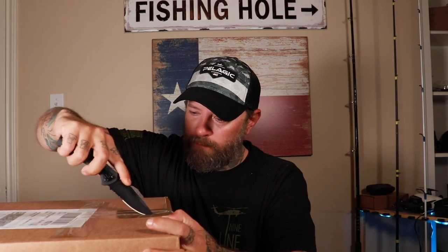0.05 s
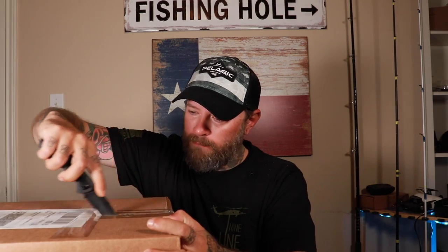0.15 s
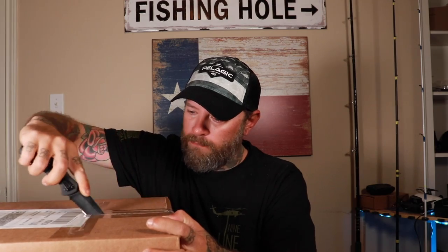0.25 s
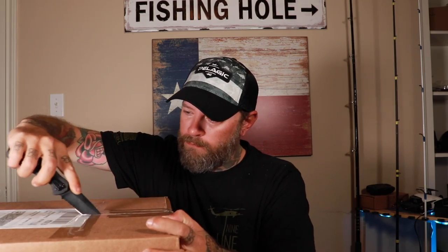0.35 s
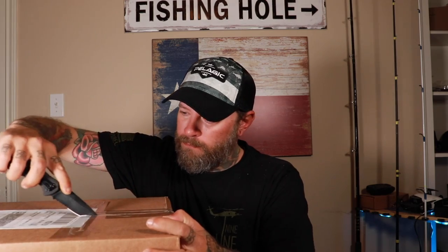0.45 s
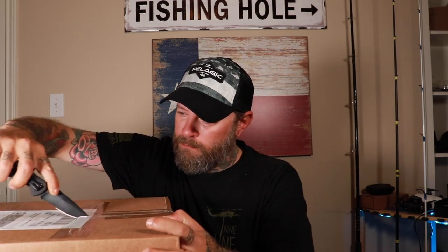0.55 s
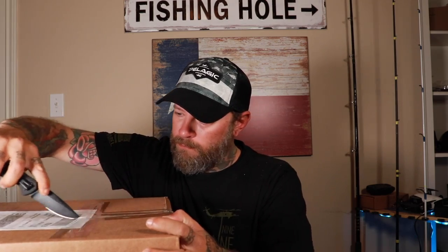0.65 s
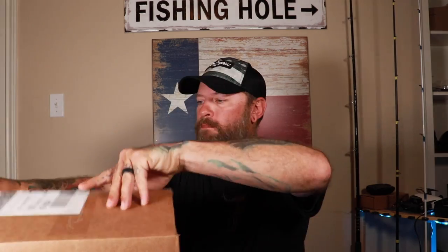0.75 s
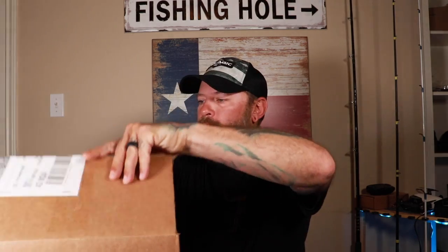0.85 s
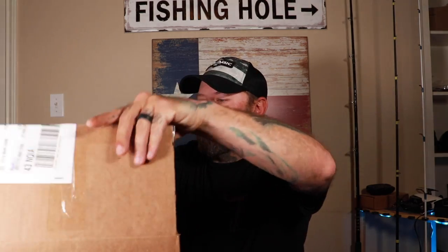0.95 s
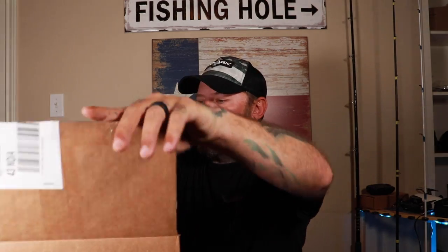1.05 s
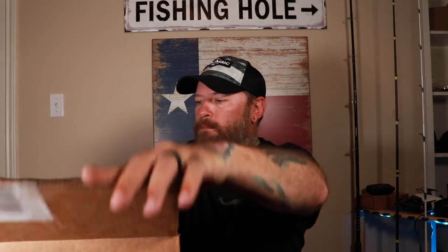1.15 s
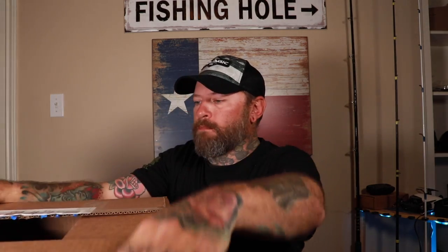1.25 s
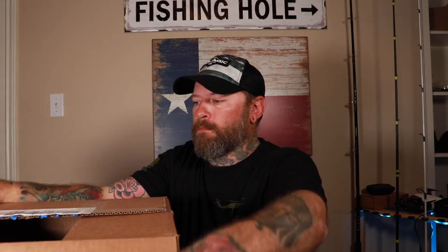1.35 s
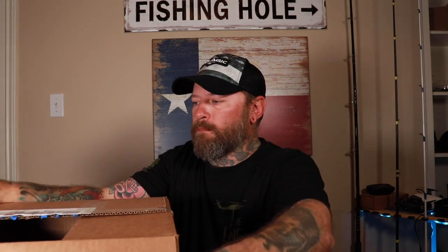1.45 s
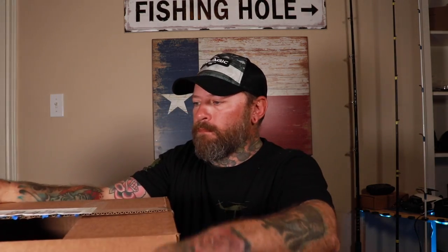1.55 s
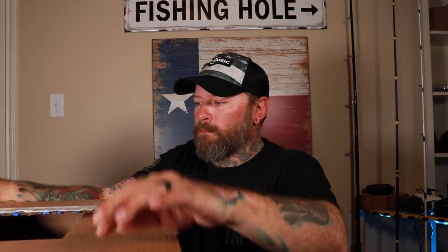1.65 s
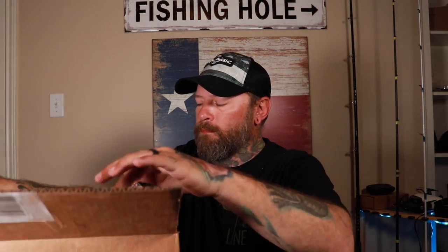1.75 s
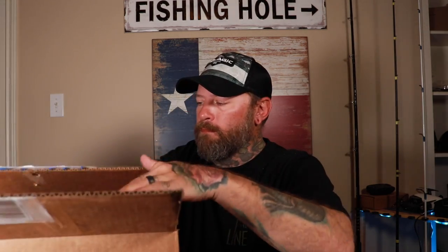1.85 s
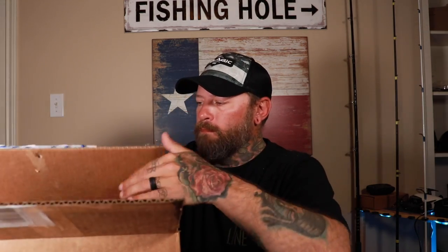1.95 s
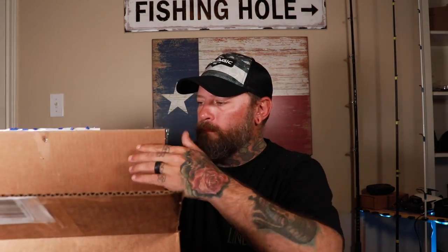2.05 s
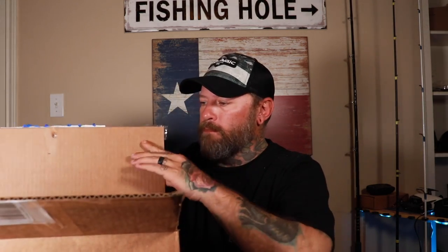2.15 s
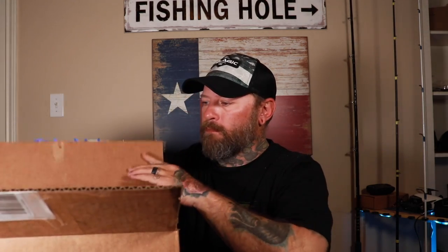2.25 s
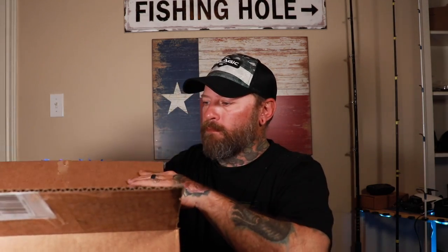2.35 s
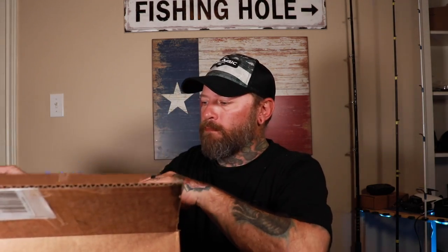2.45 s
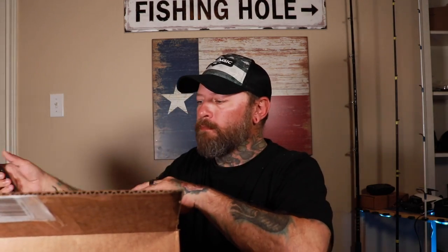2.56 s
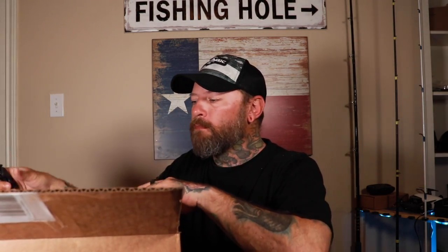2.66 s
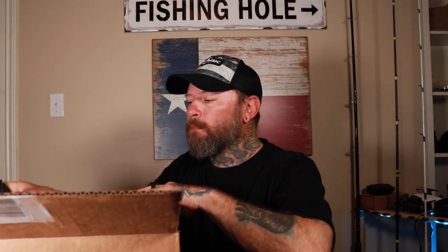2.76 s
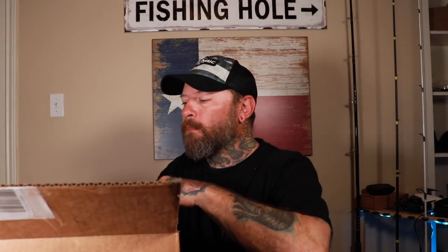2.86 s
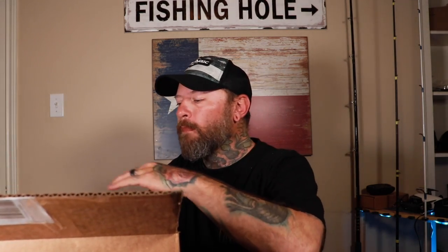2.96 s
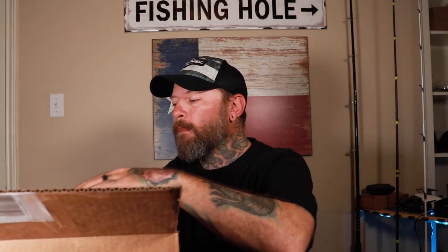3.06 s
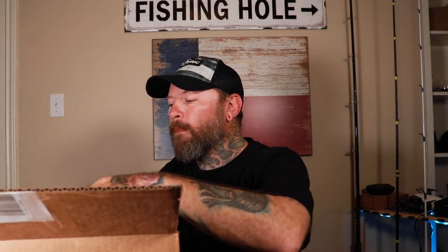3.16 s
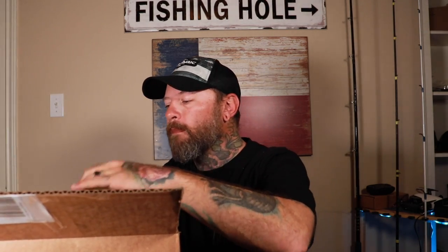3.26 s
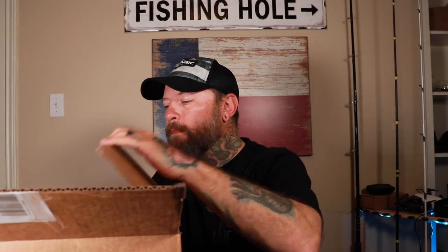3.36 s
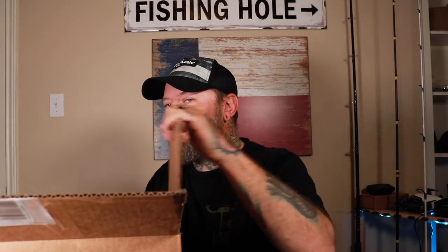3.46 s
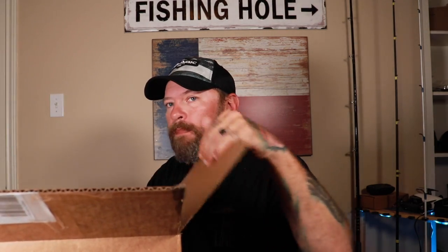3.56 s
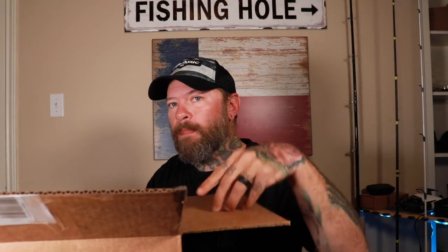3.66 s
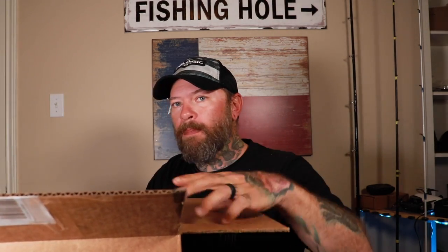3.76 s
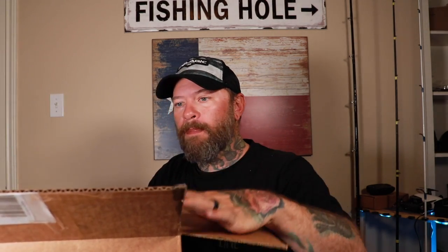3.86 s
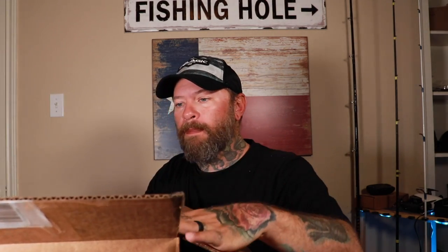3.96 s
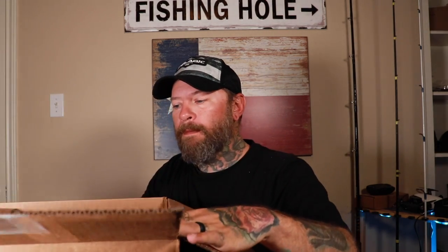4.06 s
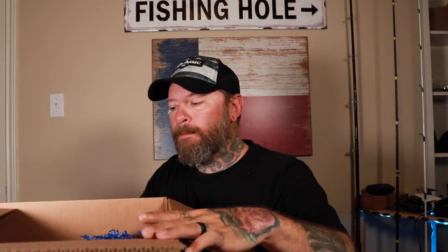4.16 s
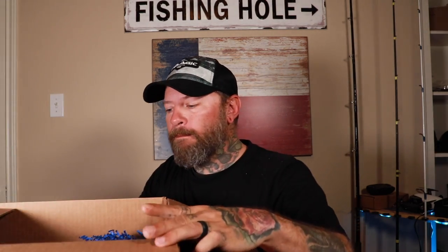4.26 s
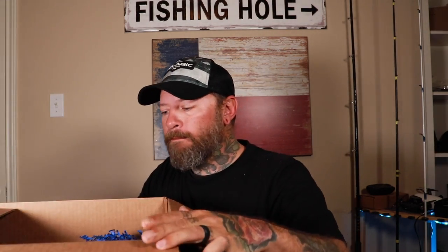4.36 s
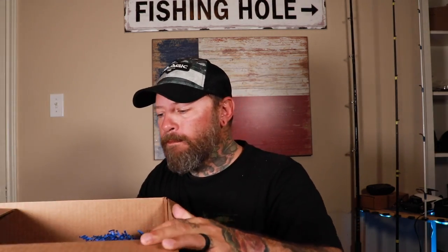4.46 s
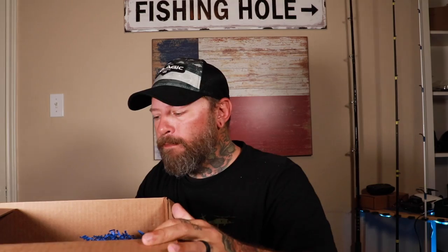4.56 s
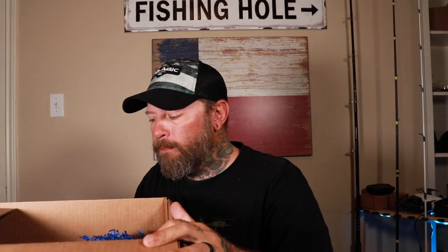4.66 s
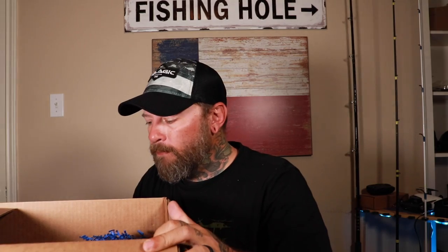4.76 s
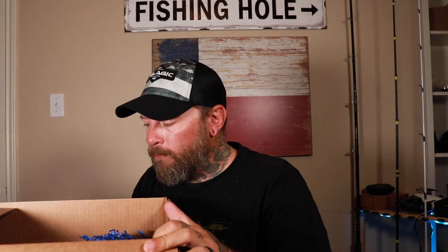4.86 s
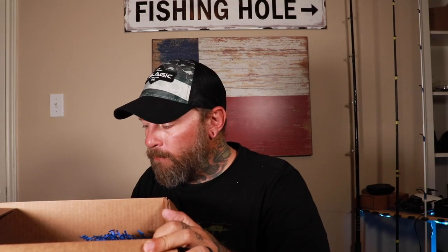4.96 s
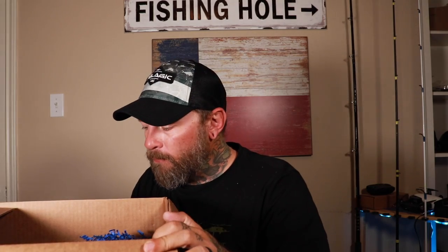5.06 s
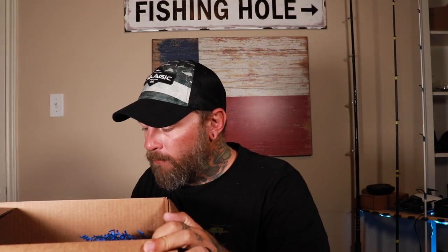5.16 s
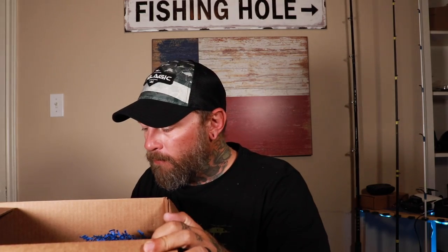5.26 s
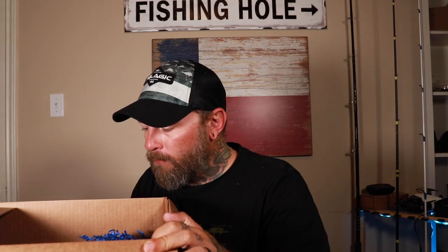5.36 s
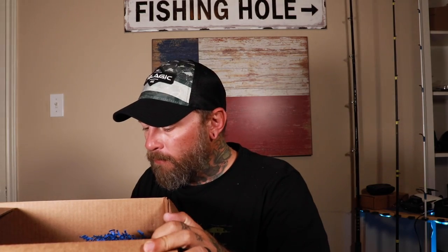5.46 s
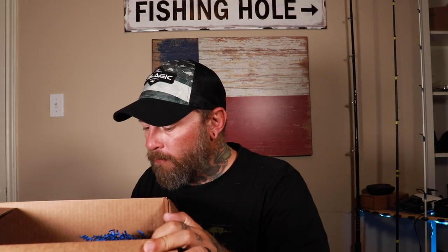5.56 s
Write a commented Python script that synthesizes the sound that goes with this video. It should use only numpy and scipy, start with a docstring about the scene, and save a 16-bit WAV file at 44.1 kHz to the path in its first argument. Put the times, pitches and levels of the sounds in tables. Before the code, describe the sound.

Dry close microphone indoors: harsh blade rasps along a taped seam, then an abrupt edit into a boomy cardboard thump with small tape cracks. Hands scuff and tap the hollow box ever more quietly. Midway comes almost stillness, then a brisk cluster of scrapes, knocks and fibre snaps as a flap folds back, another hollow knock, and tiny fading brushes.

```python
"""Quiet room, close by: a knife slits the tape of a cardboard box, then hands tilt, rub and unfold it.
Blade and skin stick and slip; the jerks excite resonances of board, fibres and box walls.
Knocks ring the hollow box; tape and fibres snap as short noise cracks.
After the knife strokes the sound cuts dead and fades back in; a dull echo and faint hiss lie behind."""
import sys
import numpy as np
from scipy import signal
from scipy.fft import rfft, irfft
from scipy.io import wavfile
from scipy.ndimage import uniform_filter1d

SR = 44100
rng = np.random.default_rng(int(sys.argv[2]) if len(sys.argv) > 2 else 0)


def output_pcm(signal):
    """Save a mono or channel-first signal as 16-bit PCM at the path in sys.argv[1].

    Samples are clipped to [-1, 1] before scaling.
    """
    pcm = np.clip(np.atleast_2d(signal).T, -1, 1) * 32767
    wavfile.write(sys.argv[1], SR, np.round(pcm).astype(np.int16))


N = 246959
GAP_S, GAP_FADE_S = 0.7745, 0.033  # dead cut, then linear fade-in


def undb(db):
    """Decibels to amplitude gain."""
    return 10 ** (np.asarray(db) / 20)


def unit(x):
    """Scale to rms 1."""
    return x / np.sqrt(np.mean(x ** 2))


def resonate(x, hz, width_hz):
    """Two-pole band-pass, gain 1 at the centre."""
    b, a = signal.iirpeak(hz, hz / width_hz, fs=SR)
    return signal.lfilter(b, a, x)


def walk(rate_hz):
    """Random levels, one per 1 / rate_hz, joined by ramps; spread near 1."""
    hold = int(SR / rate_hz)
    levels = rng.standard_normal(N // hold + 1)
    return 1.255 * uniform_filter1d(np.repeat(levels, hold), hold)[:N]


# Hollow box: air cavity below 170 Hz, walls above. Columns: mode_hz, level_db, t60_s
BOX_MODES = [(70, -12, 0.11), (95, -6, 0.31), (138.5, 0, 0.38), (183.2, -6.5, .2), (219, -4.5, 0.07),
             (286.7, -1.5, 0.17), (349, -4, 0.26), (420.3, -9.5, 0.18), (470.4, -4.5, .18),
             (517, -7, 0.087), (602, -5.5, 0.083), (737, -9.5, 0.072), (842, -11, 0.094), (945, -7, 0.091),
             (1047, -10, 0.081)]
# Stiff board under blade and skin. Columns: centre_hz, width_hz, level_db
BOARD_PEAKS = [(1290, 300, -2.5), (1589, 480, 5.5), (1972, 590, 1.5), (2750, 950, -4), (3080, 1200, -6.5)]
# Steady draw of the blade along the taped seam. Columns: centre_hz, width_hz, level_db
BLADE_PEAKS = [(1057, 84, 2), (1598, 51, 6.5), (1910, 200, 1.5), (2520, 140, -6), (2810, 98, -4),
               (4260, 190, -21), (5030, 340, -11), (6200, 370, -17)]
# Fibre rasp. Columns: centre_hz, width_hz, level_db
RASP_PEAKS = [(4180, 1300, 0.17), (5820, 2500, -1.2)]
# Fine fibre hiss. Columns: centre_hz, width_hz, level_db
FIBRE_PEAKS = [(8550, 1400, 5.5), (11400, 3000, -8.5), (13900, 3900, -15)]


def rubbing():
    """Blade and hands drag on cardboard: board scrape, fibre hiss, and the box driven through its walls."""
    t = np.arange(N) / SR
    scrape_gain, boom_gain, rattle_gain, rasp_gain, hiss_gain, wall_hz = strokes(t)
    # the hand damps the walls: modes wider than in free ringing
    damped = [(hz, 2.33 * np.log(1000) / (np.pi * t60_s), db) for hz, db, t60_s in BOX_MODES]
    low_modes = [m for m in damped if m[0] < 550]
    high_modes = [m for m in damped if m[0] >= 550]

    coarse = slips(1200, spread_db=2.0)
    fine = slips(5000, spread_db=3.0)
    boom = sweep(coarse, 2.36, low_modes, wall_hz, focus_db=9.0)
    rattle = resonate(through(coarse, 1.26, high_modes, drift_db=2.5), 820, 1000)
    scrape = resonate(through(coarse + fine, 2.5, BOARD_PEAKS, drift_db=3.0), 2300, 3500)
    rasp = resonate(through(coarse + fine, 2.32, RASP_PEAKS, drift_db=2.5), 4600, 4500)
    hiss = resonate(through(fine, 1.2, FIBRE_PEAKS, drift_db=5.0), 8900, 11000)

    # the steady draw sets in within 2 ms and mostly replaces the scrape until the gap
    drawing = np.interp(t, (0.423, 0.425), (0, 1)) * (t < GAP_S)
    blade = through(coarse, 2.9, BLADE_PEAKS, drift_db=0.5)
    scrape = (1 - 0.93 * drawing) * unit(scrape) + drawing * undb(1.5) * blade

    mix = scrape_gain * scrape + boom_gain * boom + rattle_gain * unit(rattle)
    mix = mix + rasp_gain * unit(rasp) + hiss_gain * unit(hiss)
    judder = undb(1.13 * walk(70))
    return mix * judder


# Strokes of blade or hand; swell and fade are times per 20 dB, floored in strokes().
# Columns: full_s, swell_s, hold_s, fade_s, scrape_db, boom_rel_db, pressed_wall_hz,
#          rattle_rel_db, rasp_rel_db, hiss_rel_db
STROKES = [(0.019, 2.5, 0.058, 0.1938, -26.5, 5, 272, -2, -2, -9.5),
           (0.177, -0.17, 0.028, 0.17, -23.5, 3, 320, 2, -8.5, -10),
           (0.252, 0.03, 0.045, 0.17, -26, 4, 288, 4, -10, -14.5),
           (0.449, -0.8, 0.15, -0.04, -38.5, 3.5, 258.7, -0.5, -8, -14),
           (0.593, -0.17, 0.068, -0.17, -39, 9, 219.8, -1, -10, -12.5),
           (0.714, 0.3, .3, -4, -41, 6.5, 225, 1, -9, -15),
           (.811, .05, .03, .1, -42.5, -5, 340, -1, -7, -7),
           (0.855, -0.04, 0.037, 0.0644, -42.5, 22, 301, 12.5, -7, -11.5),
           (.96, 0.1, 0.016, 0.12, -36, -5.5, 260, -1, -8.5, -11.5),
           (1.023, -0.9, 0.046, 0.28, -45, 0, 272, 0, -5, -8),
           (1.227, 0.11, 0.038, 0.0668, -35.5, -1.5, 367, -3.5, -10, -6.5),
           (1.409, 0.2, 0.016, 0.28, -46, -1.5, 283, -4.5, -5.5, -7),
           (1.647, -0.3, 0.016, 0.18, -49.5, 3, 283, 1.5, -12, -8),
           (1.723, 0.08, 0.015, 0.09, -47, -7, 220, -10, -3, -4),
           (1.925, 0.04, 0.04, 0.15, -52, 13.5, 198, -6, -1.5, -16),
           (1.955, .03, 0.062, .11, -42.5, -2, 220, -7, -4.5, -12),
           (2.206, -0.08, 0.05, 0.14, -48, 12.5, 209, -8.5, -7.5, -5.5),
           (2.269, -0.07, 0.013, 0.09, -40.5, 4, 295, -2.5, -3.5, -9),
           (2.388, 0.1, 0.023, 0.1155, -46, -4.5, 292, -6.5, -6.5, -5),
           (2.765, 0.11, 0.053, 0.06, -55, 9.5, 284, -1, -5, -11),
           (2.74, 0.34, .19, 0.2, -60, -7, 269, -11, -4.5, -11),
           (3.024, 0.34, 0.025, .06, -60, 1, 380, -2, -5.5, -1.5),
           (3.305, 0.4, .02, 2, -73.5, 9, 270, -6, -14, -7),
           (3.364, 0.08, 0.059, -0.08, -50.5, -1, 231, 1.5, -3.5, -18),
           (3.503, 0.08, .02, 0.3, -52.5, -9, 290, 4.5, -4, -15),
           (3.543, 0.0336, 0.042, 0.0851, -36.5, 6, 310, 5, -5.5, -3),
           (3.63, -0.0117, 0.045, 0.1555, -34.5, 2.5, 345, 1, -0.5, -7.5),
           (3.775, 0.1, 0.028, 0.1122, -34, 1.5, 480, -1, -4, 1.5),
           (3.797, -0.01, 0.034, 0.1237, -25.5, -8.5, 394, -9, -7.5, -4.5),
           (3.911, 0.05, 0.039, .1, -40, 4.5, 475, -1.5, -2, -3.5),
           (4.04, 0.28, 0.042, 0.13, -45.5, -6.5, 180, -8.5, -5.5, -8.5),
           (4.132, -0.16, 0.025, 0.03, -48, 14.5, 155, -1, -13, -16),
           (4.234, -0.08, 0.017, 0.3, -57.5, -12, 145, -11, -3.5, 0),
           (4.282, -0.08, 0.014, 0.0957, -48, 9, 184, 4.5, -22, -12),
           (4.354, 0.17, 0.047, 0.14, -48, -6.5, 203, -9, -6, -4),
           (4.524, -0.5, .02, -0.03, -55.5, 0, 290, -7, 0, -5),
           (4.547, -0.06, 0.028, 0.05, -36.5, 8.5, 300, 2.5, -4, -7),
           (4.559, -0.1, .045, 0.05, -49, 26, 286, 3, -6, -6),
           (4.652, 0.2, .03, 0.23, -56, 7, 230, -7, -6.5, -11),
           (4.726, -0.02, 0.0088, 0.07, -54, 14.5, 320, -11, -2, -3),
           (4.767, 0.27, 0.0076, 0.08, -64, 13.5, 320, 2, -6, 2),
           (4.79, 0.8, .01, 0.14, -61.5, -8, 300, -2, -8, -4),
           (4.873, 0.1, 0.018, 0.08, -54.5, -5, 250, -3, -1.5, -4),
           (5.023, 0.16, 0.044, 0.07, -64.5, 6, 260, -1.5, -8, -9.5)]


def strokes(t):
    """Each stroke swells, holds and fades; overlapping strokes add their power in every layer."""
    layers, wall = np.full((5, N), 1e-14), np.full(N, 1e-14)
    for full_s, swell_s, hold_s, fade_s, level_db, boom_db, wall_hz, *upper_db in STROKES:
        before = np.maximum((full_s - t) / max(swell_s, 0.002), 0)
        after = np.maximum((t - full_s - hold_s) / max(fade_s, 0.045), 0)
        same_side = (t < GAP_S) == (full_s < GAP_S)  # no stroke crosses the gap
        power = 10 ** (level_db / 10 - 2 * (before + after)) * same_side
        layers = layers + power * undb([[0], [boom_db], *np.c_[upper_db]]) ** 2
        wall = wall + power * undb(boom_db) ** 2 * np.log(wall_hz)
    pressed_hz = np.exp(wall / layers[1])  # mean pitch, weighted by boom power
    return *np.sqrt(layers), pressed_hz


def slips(per_s, spread_db):
    """Stick-slip: irregular jerks of uneven size, capped at three times the spread."""
    jerks = (rng.random(N) < per_s / SR) * rng.choice([-1., 1.], size=N)
    size_db = spread_db * np.minimum(rng.exponential(size=N), 3)
    return unit(jerks * undb(size_db))


def through(jerks, hiss, peaks, drift_db):
    """Shared jerks plus each resonance's own hiss; strengths drift as the contact point moves."""
    total = 0
    for hz, width_hz, db in peaks:
        gain = undb(db + drift_db * walk(12))
        total = total + gain * resonate(jerks + hiss * rng.standard_normal(N), hz, width_hz)
    return unit(total)


def sweep(jerks, hiss, peaks, centre_hz, focus_db):
    """Resonances ring more strongly the nearer they lie to the moving region that is pressed."""
    total, power = 0, 0
    for hz, width_hz, db in peaks:
        share = undb(db - focus_db * np.log2(hz / centre_hz) ** 2)
        drive = jerks + hiss * rng.standard_normal(N)
        ring = resonate(resonate(drive, hz, width_hz), hz, 3.0 * width_hz)
        total = total + share * unit(ring)
        power = power + share ** 2
    return total / np.sqrt(power)


# Knocks on the box; levels are relative, offsets added in knocks().
# Columns: start_s, level_db, struck_wall_hz, cavity_hz, cavity_rel_db, upper_modes_rel_db
KNOCKS = [(0.843, -5, 387, 166, -25.5, -4), (1.638, -28, 289, 135, -14, -3),
          (1.919, -17, 176, 88, -11, -23), (2.204, -19, 210, 95, -7.5, -21),
          (2.773, -27, 286, 84, 4.5, -12), (3.011, -40.5, 400, 105.4, -15, 8),
          (3.33, -28, 290, 88, -2.5, -9), (3.524, -24.5, 217, 166, -20, 3),
          (3.554, -24.5, 288, 132, -33, 2), (3.796, -9, 570, 129, -22.5, -4),
          (4.136, -28, 288, 135, -2, -8), (4.28, -32, 285, 135, 1, -2.5), (4.551, -10, 342, 139, -4, -10.5),
          (4.724, -25.5, 332, 133, -12.5, -21)]


def knocks():
    """A short rattling push rings the air cavity and the wall modes near where it lands."""
    out, t = np.zeros(N + SR), np.arange(SR // 2) / SR
    push_decay_s, push_rise_s = 0.0101, 0.0025
    hz, db, t60_s = np.transpose(BOX_MODES)[:, :, None]
    ring = np.sin(2 * np.pi * hz * t) * np.exp(-np.log(1000) * t / t60_s)
    for start_s, level_db, wall_hz, cavity_hz, cavity_db, upper_db in KNOCKS:
        push = rng.standard_normal(len(t)) * np.exp(-t / push_decay_s)
        push = push * np.minimum(t / push_rise_s, 1)  # the push ramps up over 2.5 ms
        modes = signal.fftconvolve(push[None], ring, axes=1)[:, :len(t)]
        modes = modes / np.abs(modes).max(axis=1, keepdims=True)
        cavity = cavity_db + 7.0 - 85.0 * np.log2(hz / cavity_hz) ** 2
        wall = -25.0 * np.log2(hz / wall_hz) ** 2
        share_db = db + np.where(hz < 170, cavity, np.where(hz < 550, wall, upper_db + 2.5))
        at = int(start_s * SR)
        out[at:at + len(t)] += np.sum(modes * undb(level_db - 10.5 + share_db), axis=0)
    # high-pass the knocks at 75 Hz
    return signal.sosfilt(signal.butter(2, 75, "high", fs=SR, output="sos"), out[:N])


# Tape and fibre snaps. Columns: start_s, peak_db, ring_hz, bright_crack_rel_db
SNAPS = [(0.175, -12, 1820, -9.5), (0.248, -27, 1840, -8.5), (0.848, -18.5, 1180, -11),
         (0.967, -19.5, 1670, -21), (1.098, -27, 2720, -22), (1.212, -34, 2440, -7),
         (1.642, -34.5, 1480, -22.5), (1.751, -22.5, 2750, -6), (1.911, -37, 1580, -24),
         (1.954, -29, 2760, -13.5), (2.203, -34.5, 1730, -27), (2.264, -24, 1220, -29),
         (2.277, -25, 1260, -39), (3.353, -35, 2520, -18), (3.529, -27.5, 1210, -40),
         (3.633, -27.5, 1570, -5), (3.657, -15.5, 1850, -4), (3.797, -14, 1560, -20),
         (3.826, -10, 1580, -16), (3.857, -19, 1490, -7), (4.027, -28, 8800, -18), (4.239, -38, 2150, -7.5),
         (4.282, -40, 1620, -23.5), (4.545, -23.5, 3000, -20), (4.721, -38, 2130, -4)]


def snaps():
    """A fibre or strip of tape lets go: a crack of about a millisecond and a short rustle."""
    out, t = np.zeros(N + SR), np.arange(SR // 20) / SR
    for start_s, peak_db, ring_hz, bright_db in SNAPS:
        decay = np.exp(-t / 0.0011) + undb(-11) * np.exp(-t / 0.0065)
        burst = rng.standard_normal(len(t)) * decay
        bright = resonate(resonate(burst, 5000, 7200), 5000, 11000)
        crack = undb(bright_db) * bright + resonate(burst, ring_hz, 0.27 * ring_hz)
        at = int(start_s * SR)
        out[at:at + len(t)] += crack * undb(peak_db) / np.abs(crack).max()
    return out[:N]


# Room tone spectrum, relative density. Columns: freq_hz, density_db (per Hz)
ROOM_SPECTRUM = [(24, -58), (40, -34.5), (130, 1.5), (262, -5.5), (570, -8), (680, -7.5), (751, -8.5),
                 (1410, -8), (2150, -7.5), (3740, -12.5), (16000, -24)]


def room_tone():
    """Faint steady air and microphone hiss: noise shaped in frequency, level wandering slightly."""
    hz, db = np.transpose(ROOM_SPECTRUM)
    f = np.maximum(np.fft.rfftfreq(N, 1 / SR), 1)
    shape = undb(np.interp(np.log(f), np.log(hz), db))
    noise = irfft(rfft(rng.standard_normal(N)) * shape, N)
    return unit(noise) * undb(-69.5 + 0.29 * walk(3))


def scene():
    """Near sound plus room tone and a short, dull echo from the walls."""
    near = rubbing() + knocks() + snaps()
    echo_db, echo_t60_s, echo_delay_s = -19, 0.089, 0.004
    t = np.arange(SR // 2) / SR
    tail = rng.standard_normal(len(t)) * np.exp(-np.log(1000) * t / echo_t60_s) * (t > echo_delay_s)
    tail = signal.lfilter([1], [1, -0.5], tail)
    tail = tail / np.linalg.norm(tail)
    # no echo carries across the gap
    early = np.arange(N) / SR < GAP_S
    echo_before = signal.fftconvolve(near * early, tail)[:N]
    echo_after = signal.fftconvolve(near * ~early, tail)[:N]
    echo = np.where(early, echo_before, echo_after)
    return (near + undb(echo_db) * echo + room_tone())[None]


def record(dry):
    """All sound cuts dead at the gap and fades in again; bass below 72 Hz and top above 15.8 kHz are cut."""
    since_s = np.arange(N) / SR - GAP_S
    gate = np.where(since_s < 0, 1, np.clip(since_s / GAP_FADE_S, 0, 1))
    low_cut = signal.sosfilt(signal.butter(4, 72, "high", fs=SR, output="sos"), dry * gate)
    return signal.sosfilt(signal.ellip(10, 0.2, 60, 15800, fs=SR, output="sos"), low_cut)


dry = scene()
out = record(dry)
output_pcm(out)
```